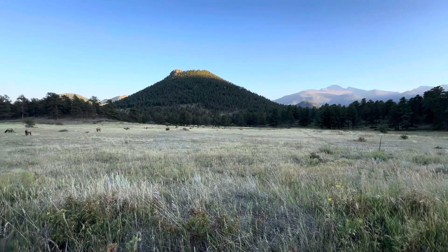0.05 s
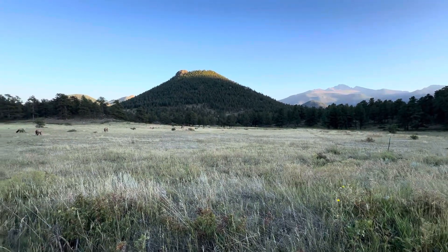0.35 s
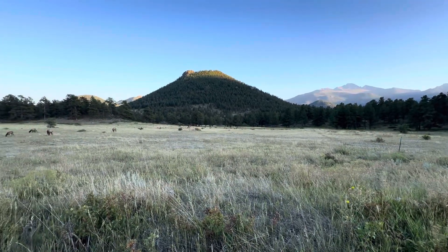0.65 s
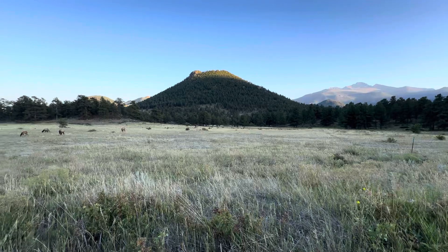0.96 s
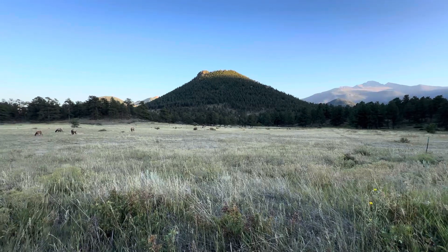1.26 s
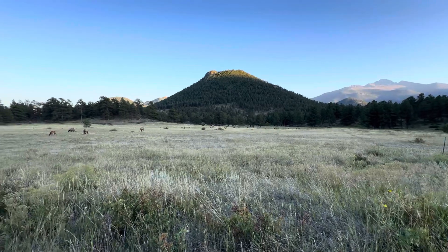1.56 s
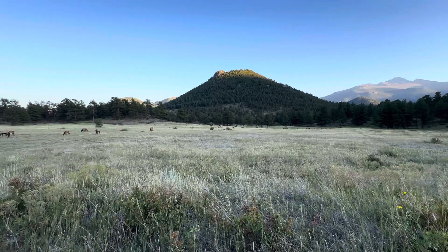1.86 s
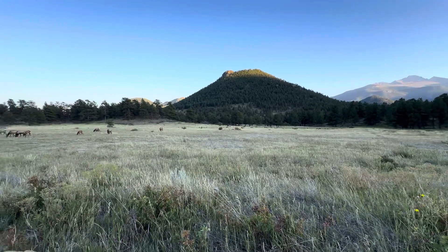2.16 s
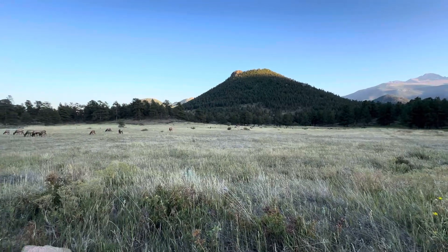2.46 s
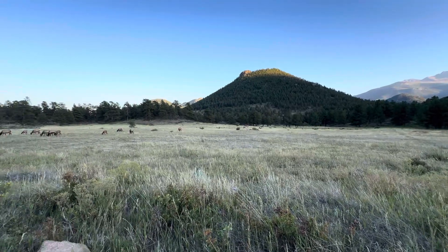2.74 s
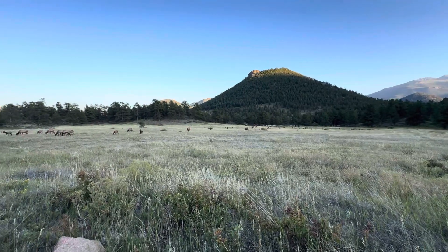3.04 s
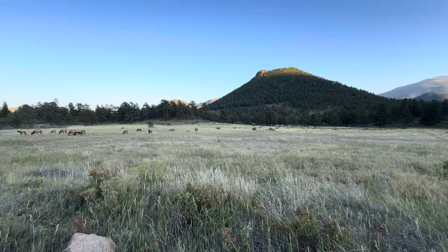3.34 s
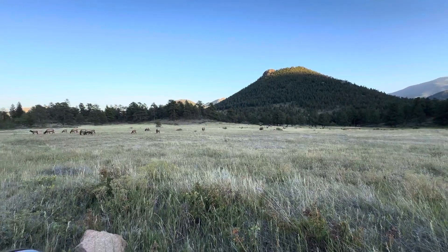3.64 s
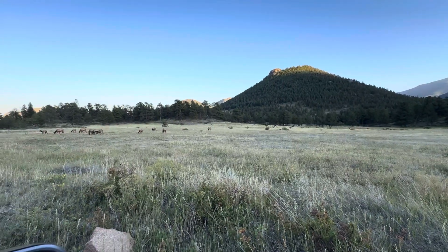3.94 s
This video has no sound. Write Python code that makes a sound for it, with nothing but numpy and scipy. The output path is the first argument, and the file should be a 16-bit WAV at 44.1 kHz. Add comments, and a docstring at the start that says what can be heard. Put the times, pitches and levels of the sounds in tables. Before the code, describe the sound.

Gusty wind buffets the microphone in a meadow, then drops, leaving a low engine throb.

```python
"""Gusts buffet a stereo microphone in an open meadow, rumbling, thumping and popping as eddies strike
its two ports, and die down after a couple of seconds. Farther off, air and grass hiss steadily, mostly
from the left, with a thin whine; a few faint dry ticks sound close by. As the wind drops, the low throb
of an idling engine comes forward, each firing a muffled puff through its exhaust pipe."""
import sys
import numpy as np
from scipy import signal
from scipy.fft import rfft, irfft
from scipy.io import wavfile
from scipy.ndimage import uniform_filter1d

SR = 44100
rng = np.random.default_rng(int(sys.argv[2]) if len(sys.argv) > 2 else 0)


def generate_wav(sig):
    """Save sig (samples, or channels by samples) to the path in sys.argv[1] as 16-bit PCM at SR."""
    pcm = np.round(np.clip(np.atleast_2d(sig).T, -1, 1) * 32767).astype(np.int16)
    wavfile.write(sys.argv[1], SR, pcm)


N = 176400
T = np.arange(N) / SR
BIN_HZ = np.arange(N // 2 + 1) * SR / N


def from_db(db):
    """Decibels to gain."""
    return 10 ** (np.asarray(db) / 20)


def rms_one(x):
    """Scale to unit power."""
    return x / np.sqrt(np.mean(x ** 2) + 1e-20)


def in_time(rows):
    """Each column of a table over time, read at every sample."""
    times, *columns = np.transpose(rows)
    return [np.interp(T, times, column) for column in columns]


def per_bin(points):
    """A table over frequency, read at every spectral line."""
    hz, value = np.transpose(points)
    return np.interp(np.log(BIN_HZ + 1e-3), np.log(hz), value)


def panned(db):
    """Left and right gains for a level difference, left minus right."""
    return from_db(np.array([[1], [-1]]) * db / 2)


def noise(spectrum, likeness=0):
    """Coloured stereo noise of unit power; likeness below 0 pushes on one port and pulls on the other."""
    low_hz, high_hz = spectrum[0][0] / 2, 2 * spectrum[-1][0]
    roll_off = BIN_HZ / (BIN_HZ + low_hz) / (1 + (BIN_HZ / high_hz) ** 4)
    white = rfft(rng.standard_normal((2, N)))
    mid, side = irfft(white * from_db(per_bin(spectrum)) * roll_off, N)
    return rms_one(np.sqrt(1 + likeness) * mid + np.sqrt(1 - likeness) * side * [[1], [-1]])


def drift(hz):
    """A random wander of unit power for each port, mostly slower than hz."""
    step, settle = 40, 2000
    pole = np.exp(-2 * np.pi * hz * step / SR)
    white = rng.standard_normal((2, N // step + settle + 2))
    slow = signal.lfilter([1], [1, -2 * pole, pole ** 2], white)[:, settle:]
    return np.array([np.interp(np.arange(N) / step, np.arange(len(s)), rms_one(s)) for s in slow])


def evened(x, share, window_s=0.038):
    """Even out a share of a noise's chance swells, at unit power."""
    power = uniform_filter1d(x ** 2, int(window_s * SR), axis=-1) + 1e-9
    return rms_one(x / power ** (share / 2))


def burst(start, attack_s, decay_s):
    """A straight rise and an exponential fall."""
    age = T - start
    return np.clip(age / attack_s, 0, 1) * np.exp(-np.clip((age - attack_s) / decay_s, 0, 20))


def butter(x, hz, kind, order):
    """Causal Butterworth filter."""
    return signal.sosfilt(signal.butter(order, hz, kind, fs=SR, output="sos"), x + 1e-18)


def wind():
    """Lumpy turbulence right at the ports: a deep rumble and a flutter that flares in the gusts."""
    # gust strength: t/s, relative rumble level/dB, relative flutter level/dB
    gusts = [(0.0, -40, -48.5), (0.06, -37, -46), (0.14, -43.5, -48), (0.22, -36, -35.5),
             (0.33, -38.5, -50.5), (0.42, -31, -33), (0.51, -32, -34.5), (0.55, -40, -54.5),
             (0.63, -30.5, -47), (0.67, -46, -58), (0.78, -38, -38.5), (0.815, -21, -31.5),
             (0.84, -35, -39.5), (0.93, -33, -33.5), (1.04, -35, -54), (1.1, -35.5, -32),
             (1.12, -37.5, -48), (1.14, -45.5, -54.5), (1.19, -27, -34.5), (1.32, -45.5, -44.5),
             (1.37, -30, -45.5), (1.435, -36.5, -31.5), (1.48, -43, -46.5), (1.52, -36.5, -45.5),
             (1.555, -50.5, -54), (1.6, -39.5, -51), (1.66, -52.5, -43), (1.765, -36, -51),
             (1.81, -41, -46.5), (2.08, -43.5, -55.5), (2.16, -43, -50), (2.28, -41.5, -51.5),
             (2.44, -49.5, -58), (2.52, -38.5, -43), (2.61, -51, -55.5), (2.67, -54, -65.5),
             (2.72, -46.5, -46), (2.79, -54, -78), (3.0, -54, -59.5)]
    # side the gusts favour: t/s, left minus right/dB
    gust_pan = [(0, -3), (.2, 0), (.43, 1.5), (.6, -2), (.9, -0.5), (1.2, 0), (1.4, 1), (1.6, -3.5),
                (1.77, 3.5), (2.3, -0.5), (2.6, 0.5)]
    # spectra of the turbulence: f/Hz, relative level/dB
    rumble_spectrum = [(20, -36.5), (30, -18), (42, -10.5), (65, 2.5), (100, -6), (150, -10), (210, -12),
                       (350, -56)]
    flutter_spectrum = [(100, -8.5), (170, 7), (235, 1.5), (330, 0), (480, -13.5), (750, -21),
                        (1100, -34.5), (2000, -52.5)]
    rumble_db, flutter_db = in_time(gusts)
    lumps_hz = 60
    rumble = evened(noise(rumble_spectrum, likeness=-0.35), share=0.96)
    rumble *= from_db(rumble_db + 4.5 + 0.5 * drift(lumps_hz))
    flutter = noise(flutter_spectrum, likeness=0.012) * from_db(4 * drift(lumps_hz))
    flutter = evened(flutter, share=0.35) * from_db(flutter_db + 6) * panned(db=2.2)
    fade = from_db(-6.5 * np.maximum(T - 3.3, 0))   # 6.5 dB a second from 3.3 s on
    return (rumble + flutter) * panned(in_time(gust_pan)[0]) * fade


def hiss():
    """Air and grass far across the meadow; what both ports share reaches the right one later."""
    # spectrum of the hiss: f/Hz, relative level/dB
    spectrum = [(25, -14), (60, 16), (200, 0.5), (400, 2), (600, -1.5), (900, -2), (1400, -6), (1800, -6.5),
                (1980, -6), (2150, -12.5), (2600, -15.5), (3100, -18), (3700, -23.5), (4200, -26),
                (5500, -25), (7800, -26.5), (9300, -29.5), (10500, -41)]
    # how alike the ports hear it: f/Hz, coherence/0-1
    likeness = [(100, .7), (550, .5), (1100, .72), (1700, .62), (2300, .45), (5000, .3), (10000, .28)]
    # later arrival at the right port: f/Hz, delay/s
    right_lag = [(700, .00047), (1800, .00033), (2150, .00032), (2700, .00048)]
    # lean to the left: f/Hz, left minus right/dB
    pan = [(200, 0.5), (380, 3.5), (550, 7), (1000, 1.5), (2000, 1.5), (3000, 0), (4600, 8), (7000, 1.5),
           (10000, 0)]
    # swells of the whole hiss, its rustle and its treble: t/s, relative level/dB
    level = [(0, -48), (.7, -49), (1.5, -48), (2.7, -48.5), (4, -50)]
    rustle_level = [(0, -0.88), (.25, 0.78), (.7, 1.5), (1.6, 0.93), (2.6, 0.83), (3.1, 1.3), (4, -0.3)]
    treble_level = [(0, -5.5), (.25, -3.5), (.7, -0.5), (1.5, -1), (2.1, -2.5), (2.7, 0), (3.2, -3.5),
                    (4, -2)]
    left, unrelated = rfft(noise(spectrum))
    alike = per_bin(likeness)
    delay = np.exp(-2j * np.pi * BIN_HZ * per_bin(right_lag))
    right = alike * delay * left + np.sqrt(1 - alike ** 2) * unrelated
    ports = np.array([left, right]) * panned(per_bin(pan))
    # three ranges, each flickering on its own
    rustle_hz, treble_hz, flicker_db = 2440, 6500, 1.6
    upper = per_bin([(rustle_hz / 2, 0), (rustle_hz, 1)])
    treble = per_bin([(rustle_hz, 0), (treble_hz, 1)])
    ranges = [(1 - upper, 0),
              (upper - treble, in_time(rustle_level)[0]),
              (treble, in_time(treble_level)[0])]
    air = sum(irfft(ports * band, N) * from_db(db + flicker_db * drift(hz=7.2)) for band, db in ranges)
    return air * from_db(in_time(level)[0])


def whine(hz=3436, level_db=-80):
    """A faint thin tone in the hiss, wavering in phase and level."""
    tone = np.sin(2 * np.pi * hz * T + 1.6 * drift(hz=9.3))
    return tone * from_db(level_db + 1.5 * drift(hz=2.5))


def exhaust(cycles):
    """Each firing of the engine is a muffled puff that rings the exhaust pipe and echoes once."""
    # strength of the throb: t/s, level/dB
    level = [(0, -49), (2.0, -43.5), (2.8, -54.5), (3.1, -48), (3.5, -42), (3.8, -45.5), (4, -40.5)]
    # weight of its deepest part: t/s, relative level/dB
    bass_level = [(0, -7), (3.0, -2.5), (3.4, -4.5), (3.8, 5.5), (4, 2)]
    pipe_hz, half_width_hz, echo_s, echo_db = 121.3, 7.5, 0.01377, -9.5
    count = np.floor(cycles)
    firings = np.diff(count, prepend=count[0]) * from_db(drift(hz=12))   # uneven by about 1 dB
    puffs = butter(firings, 55.4, "high", order=2)
    puffs = butter(puffs, 150.5, "low", order=8)
    ring = butter(puffs, [pipe_hz - half_width_hz, pipe_hz + half_width_hz], "band", order=1)
    puffs += from_db(-0.5) * ring
    echo = np.array([np.interp(T - echo_s, T, port) for port in puffs])
    puffs += from_db(echo_db) * echo
    bass = irfft(rfft(puffs) * per_bin([(77, 1), (150, 0)]), N)
    puffs += bass * (from_db(in_time(bass_level)[0]) - 1)
    return rms_one(puffs) * from_db(in_time(level)[0])


def engine(firing_hz=23.25, firing_at_s=3.6775):
    """An engine idles behind the wind: exhaust throb and a weak hum on harmonics of the firing rate."""
    # partials of the hum: multiple of the firing rate, relative level/dB
    partials = [(1, -65.5), (11, -65.5), (12, -67), (15, -68), (16, -67), (17, -61)]
    # swell of the hum: t/s, relative level/dB
    hum_level = [(0, -12.5), (2.6, -3), (3.1, 3), (4, -3.5)]
    cycles = (T - firing_at_s) * firing_hz
    throb = exhaust(cycles)
    lag_s = np.array([[0.00064], [0]])   # the hum reaches the right port first
    heard = cycles - firing_hz * lag_s
    hum = 0
    for multiple, db in partials:
        amplitude = np.sqrt(2) * from_db(db + 1.5 * drift(hz=0.91))
        hum += amplitude * np.sin(2 * np.pi * (multiple * heard + rng.random()))
    return (throb + hum * from_db(in_time(hum_level)[0])) * panned(db=1)


def soft_eddies(attack_s=0.0068, decay_s=0.0053):
    """Slow eddies brush the ports as soft, separate thumps."""
    # thumps: t/s, level/dB
    thumps = [(0.209, -28.5), (0.29, -34.5), (0.808, -20.5), (1.654, -34.5), (1.676, -40), (1.801, -27.5),
              (1.873, -31.5), (1.926, -33), (1.962, -31.5), (2.041, -31.5), (2.083, -31), (2.138, -34.5),
              (2.227, -31.5), (2.271, -37), (2.376, -32.5), (2.505, -35)]
    # spectrum of a thump: f/Hz, relative level/dB
    spectrum = [(70, -11), (150, -7), (240, -2.5), (430, -13), (900, -47.5)]
    envelope = sum(from_db(db) * burst(start, attack_s, decay_s) for start, db in thumps)
    return evened(noise(spectrum, likeness=0.012), share=0.8) * envelope


def slaps(attack_s=0.0011):
    """The sharpest eddies hit the ports as short pops, some with a bright crack."""
    # hits: t/s, pop level/dB, decay/s, left minus right/dB, crack relative to pop/dB
    hits = [(0.211, -44.5, 0.0073, 1, -1.5), (0.358, -38.5, 0.011, 11, -11), (0.398, -35, 0.015, 3, -8),
            (0.422, -19.5, 0.0059, 9, -12), (0.465, -33.5, 0.022, 3, -16.5), (0.495, -28, 0.0084, -3, -9.5),
            (0.589, -54, 0.037, 2, 6.5), (0.755, -41, 0.0043, -10, -12), (0.801, -37.5, 0.0014, 6, 10.5),
            (0.806, -24, 0.0027, 5, 1.5), (0.933, -33.5, 0.014, 2, -15), (1.064, -40.5, 0.011, 14.5, -28),
            (1.097, -40, 0.0034, -2.5, -1), (1.183, -27.5, 0.0076, 5, -15), (1.387, -34, 0.013, -3, -15),
            (1.421, -41, 0.013, -6, -2), (1.634, -52, 0.008, 0, 5), (1.74, -36, 0.0082, 9, -15),
            (1.995, -47, 0.0068, -7, 4.5)]
    # spectra of the pop and the crack: f/Hz, relative level/dB
    pop_spectrum = [(100, -16.5), (250, 2), (380, 5.5), (520, 13), (680, -9.5), (900, -8), (1200, -25.5),
                    (2100, -59.5)]
    crack_spectrum = [(500, -24.5), (800, 7.5), (1100, -5), (1350, -9.5), (1600, -23.5), (1900, -27),
                      (3000, -47.5)]
    pop = evened(noise(pop_spectrum, likeness=-0.29), share=0.97)
    crack = evened(noise(crack_spectrum), share=0.98)
    sound = 0
    for start, db, decay_s, pan_db, crack_db in hits:
        envelope = from_db(db) * burst(start, attack_s, decay_s)
        sound += (pop + from_db(crack_db) * crack) * envelope * panned(pan_db)
    return sound


def ticks(attack_s=0.00061, skirt_db=-18):
    """Faint dry snaps close by, perhaps of grass stems, each ringing briefly around its own pitch."""
    # snaps: t/s, level/dB, decay/s, f/Hz
    snaps = [(2.06, -45.5, 0.0019, 2650), (2.084, -49, 0.0011, 2750), (2.413, -48, 0.002, 1460),
             (2.619, -54, 0.0056, 2330), (3.165, -51, 0.0068, 1850), (3.198, -61.5, 0.0045, 3100)]
    sound = 0
    for start, db, decay_s, hz in snaps:
        ring = noise([(hz / 2, skirt_db), (hz, 0), (hz * 2, skirt_db)])
        sound += ring * from_db(db) * burst(start, attack_s, decay_s)
    return sound


def scene():
    """Wind on the microphone, with the meadow and the engine behind it."""
    return wind() + soft_eddies() + slaps() + hiss() + whine() + ticks() + engine()


def record(dry, cutoff_hz=10390):
    """The top of the treble is cut steeply."""
    return signal.sosfilt(signal.ellip(10, .2, 70, cutoff_hz, fs=SR, output="sos"), dry)


dry = scene()
out = record(dry)
generate_wav(out)
```